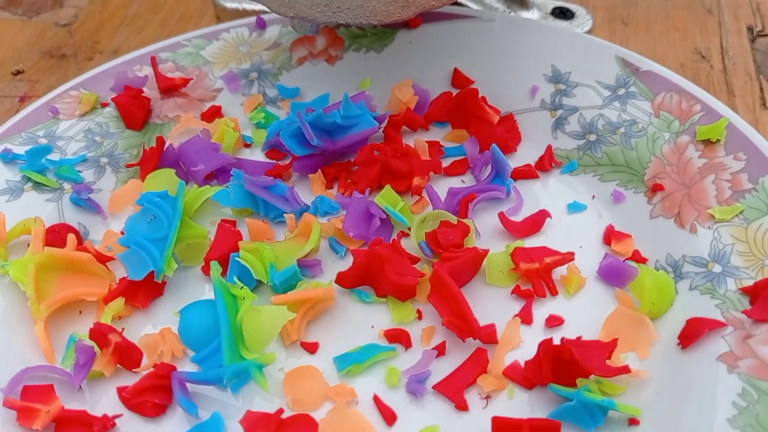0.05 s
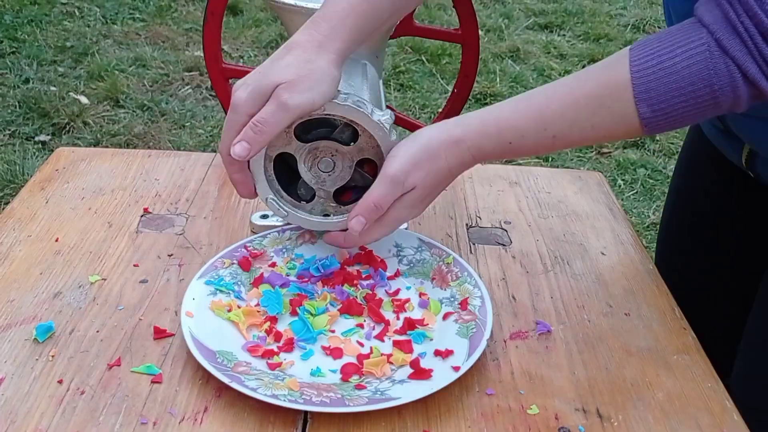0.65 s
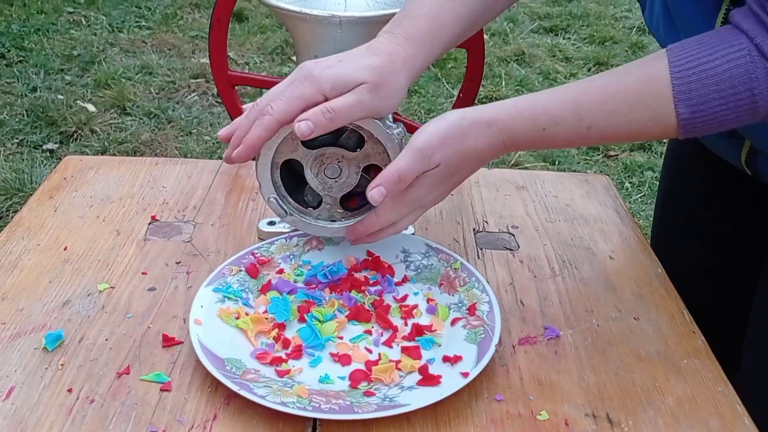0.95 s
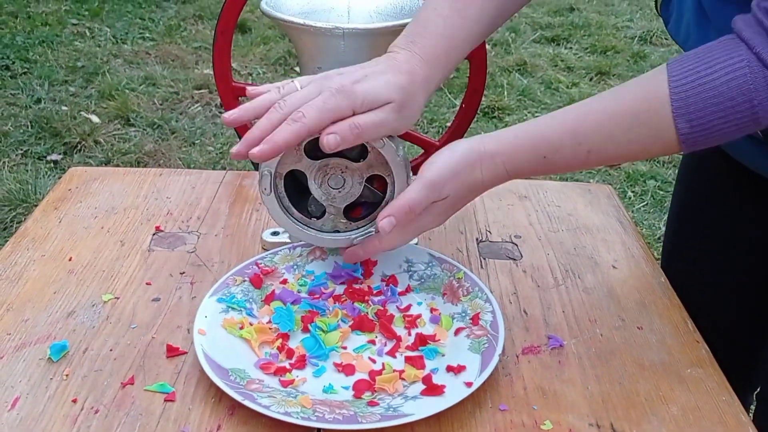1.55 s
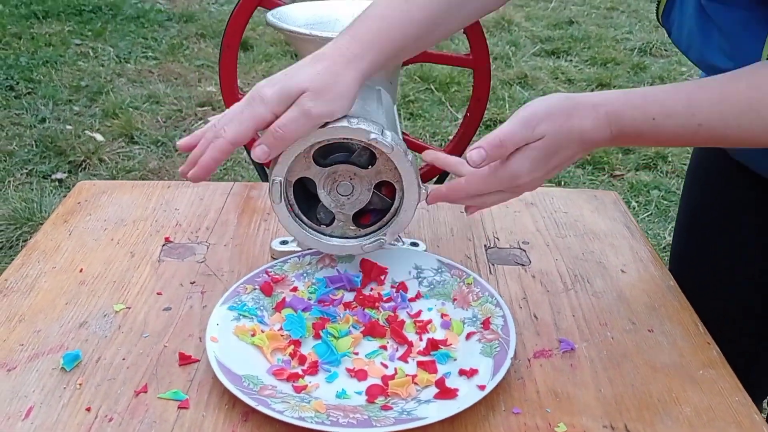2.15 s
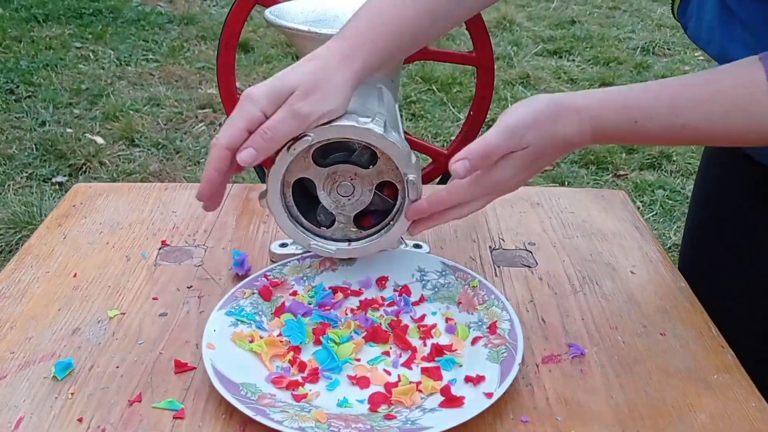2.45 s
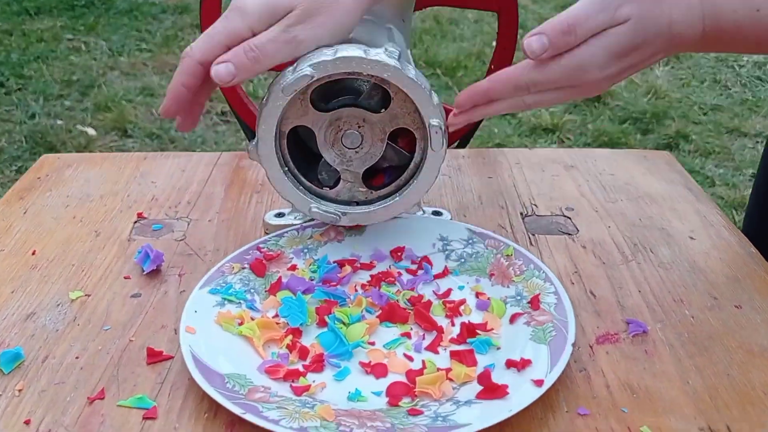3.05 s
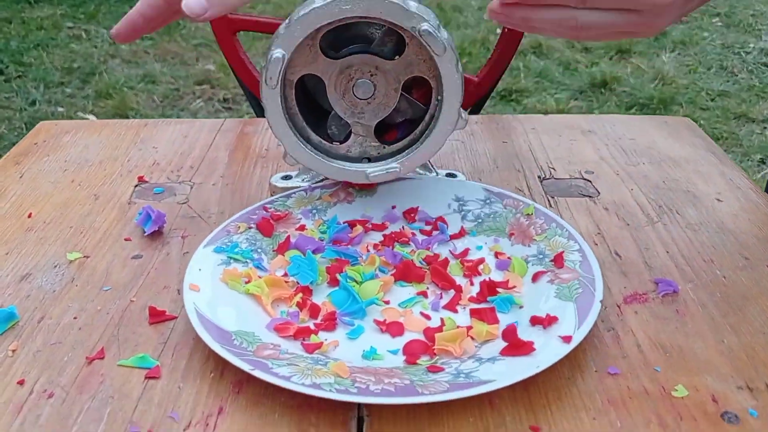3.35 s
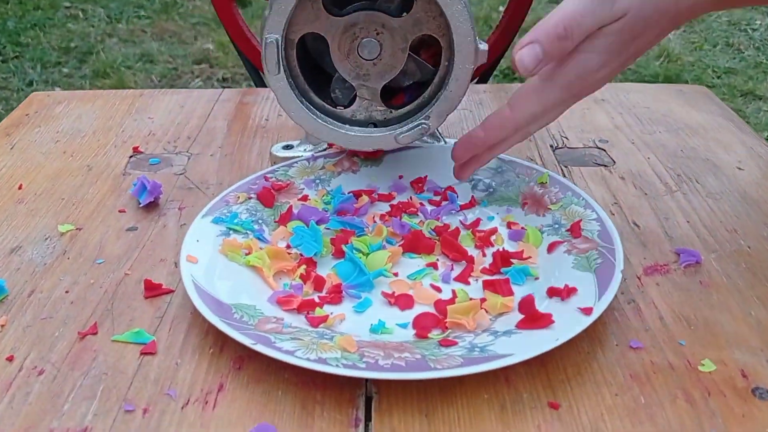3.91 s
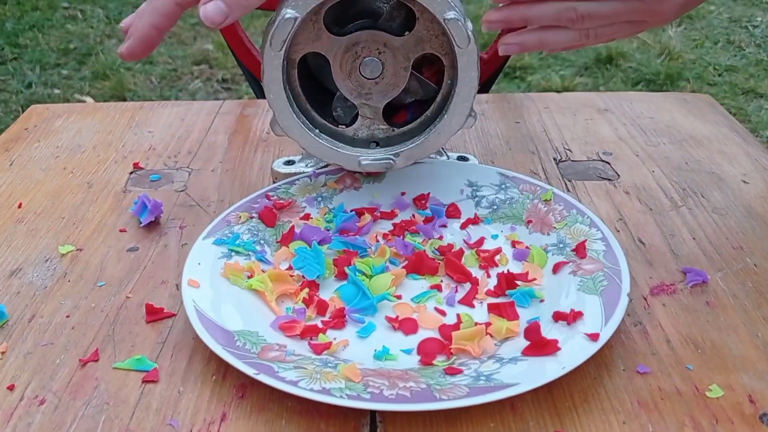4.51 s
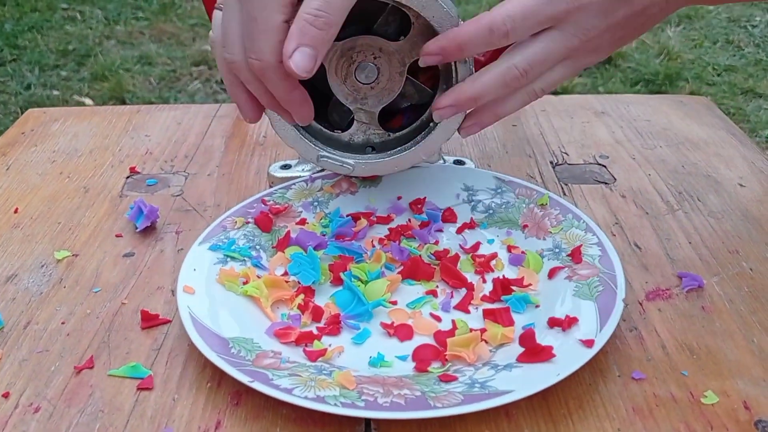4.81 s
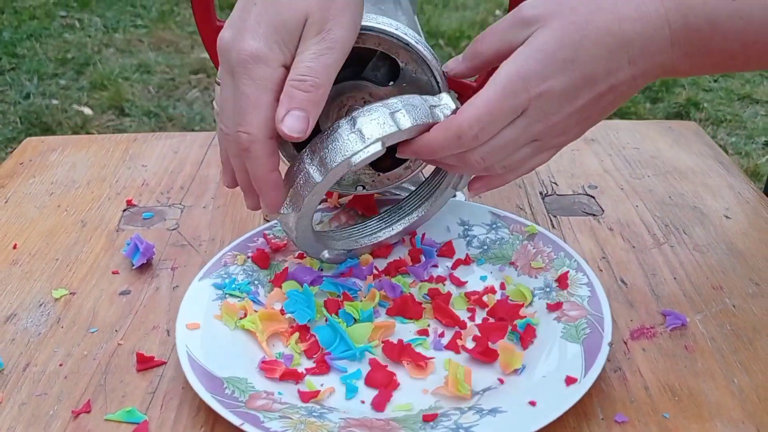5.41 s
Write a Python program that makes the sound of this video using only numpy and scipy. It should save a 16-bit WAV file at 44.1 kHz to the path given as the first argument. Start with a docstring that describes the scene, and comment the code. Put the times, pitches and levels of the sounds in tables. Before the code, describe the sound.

Close up at a wooden table in a quiet garden, a metal grinder rumbles and shears plastic for a moment and stops abruptly. Hands then unscrew its metal ring: gritty scraping twists, three or four a second, mixed with light ticks and rattling knocks. The rasp deepens as the ring loosens, with a low thrum from the table. A last, louder twist ends in a tiny squeal and a sharp, quickly muted clink.

```python
"""Outdoors at a wooden table, close up: a hand-cranked meat grinder crunches a plastic toy and stops dead.
Its retaining ring is then unscrewed in short twists: the thread rasps, the loose ring ticks and knocks,
the table booms. At last the ring sings on the end of the thread, slips off and clinks against the
housing, damped by the hands that hold it. Quiet garden air lies underneath."""
import sys
import numpy as np
from scipy import signal
from scipy.fft import rfft, irfft, next_fast_len
from scipy.io import wavfile
from scipy.ndimage import uniform_filter1d, map_coordinates

SR = 44100
rng = np.random.default_rng(int(sys.argv[2]) if len(sys.argv) > 2 else 0)


def output_pcm(signal):
    """Save a mono or channel-first signal as 16-bit PCM at the path in sys.argv[1].

    Samples are clipped to [-1, 1] before scaling.
    """
    pcm = np.clip(np.atleast_2d(signal).T, -1, 1) * 32767
    wavfile.write(sys.argv[1], SR, np.round(pcm).astype(np.int16))


N = 245637
TIME = np.arange(N) / SR

# The auger jolts the table alike in every turn. Each row: seconds into the turn, peak in dB.
AUGER_JOLTS = [(.06, -19.5), (.134, -14.5), (.15, -16), (0.175, -16), (0.196, -17)]
# The loaded grinder's resonances on its table. Each row: pitch in Hz, width in Hz, gain in dB.
GRINDER_MODES = [(183, 173, 4), (564, 52, 0.5), (880, 220, -9)]
# The broad rumble under them. Each row: frequency in Hz, gain in dB.
GRINDER_EQ = [(24, -56), (40, -26), (163, 9), (516, -8), (615, 5.5), (751, -17), (873, -6), (1340, -15),
              (5870, -34.5), (7360, -41.5), (9940, -44.5), (13100, -51), (16000, -39)]
# The crackle of shearing plastic. Each row: frequency in Hz, gain in dB.
SHEAR_EQ = [(300, -20.5), (1000, -6), (4500, 2), (6800, -3), (7800, -7.5), (9500, -7.5), (12000, -26),
            (14000, -30.5), (15600, -8)]
# The knife's four evenly spaced blades. Each entry: strength of the bite in dB.
BLADE_BITES = [-39, -27, -33, -30.5]
# Twists of the ring. Each row: start in seconds, length in seconds, level in dB.
TWISTS = [(0.586, 0.32, -37), (0.967, 0.2, -32), (1.262, 0.21, -34), (1.563, 0.26, -31),
          (1.857, .18, -33.5), (2.137, 0.11, -36), (2.393, .31, -33), (2.703, 0.21, -33),
          (2.993, 0.2, -31.5), (3.275, 0.23, -30.5), (3.514, 0.24, -31.5), (3.769, 0.17, -31.5),
          (3.994, 0.25, -30), (4.255, 0.19, -30), (4.496, 0.24, -25), (4.743, .21, -36), (5.084, 0.21, -20)]
# How loosely the ring hangs. Each row: time in seconds, looseness from 0 to 1.
RING_LOOSENESS = [(1.0, 0), (2.5, 0.33), (4.3, .3), (4.6, 0.74), (4.85, 0.97)]
# The housing's resonances with the ring on. Each row: pitch in Hz, width in Hz, gain in dB.
HOUSING_RESONANCES = [(554.7, 51, 5), (873, 74, 0), (1099.5, 25.4, -2), (1818, 57, -7), (2065, 73, -4),
                      (2381, 153, -9.5), (3390, 74, -13), (3777, 480, -15), (4950, 34, -23.5),
                      (6390, 436, -14), (9630, 240, -30.5)]
# The broad rasp between them. Each row: frequency in Hz, gain in dB.
HOUSING_EQ = [(50, -43.5), (130, -9.5), (340, -14), (470, -0.5), (760, -5.5), (1300, -11), (1600, -12),
              (2300, -13), (2900, -21), (4300, -19), (6800, -35), (7900, -32), (10000, -33.5), (13000, -50),
              (15000, -44.5)]
# The ring rocks in its thread. Each row: start in seconds, peak in dB, tilt in dB per octave.
RING_KNOCKS = [(0.776, -15.5, 0), (.79, -8, 1), (.809, -9.5, 0), (1.014, -23.5, -1), (1.339, -24, -0.5),
               (1.657, -21.5, -0.5), (2.122, -35, -3.5), (2.242, -24, -4.5), (2.822, -21.5, -3.5),
               (3.011, -33.5, -3), (3.127, -22.5, -2), (3.292, -23.5, -3), (3.646, -17.5, -3),
               (3.798, -25, -5.5), (4.082, -20, 1), (4.28, -23, .5), (4.361, -17, -2.5), (4.537, -17, -1.5),
               (4.575, -15, 0), (5.104, -10, -2), (5.236, -14.5, 3.5), (5.242, -8, -7.5), (5.307, -16, 0.5),
               (5.358, -20, -9), (5.424, -30.5, -14)]
# Light metal ticks as the grip changes. Each row: start in seconds, level in dB.
GRIP_TICKS = [(1.5062, -28), (1.8139, -30), (2.122, -43.5), (2.358, -28.5), (2.655, -42), (3.5003, -26),
              (3.7465, -24.5), (4.0023, -23.5), (4.2475, -27), (4.48, -34.5), (4.7187, -32),
              (5.0812, -26.5)]
# The ticks' bright resonances. Each row: pitch in Hz, width in Hz, gain in dB.
TICK_RESONANCES = [(4670, 580, -6.5), (6090, 74, -2.5), (6540, 270, 7), (7200, 64, -18.5), (7200, 310, -18),
                   (12080, 1200, -11.5), (14100, 500, -13.5)]
# The broad chatter under them. Each row: frequency in Hz, gain in dB.
TICK_EQ = [(100, -34), (1000, -12.5), (2200, -6), (3000, -55), (5000, -8.5), (7000, -4), (8200, -20.5),
           (9700, -12.5), (13500, -35), (16000, -30)]
# The ring strikes the housing. Each row: start in seconds, level in dB, attack in seconds,
# tilt in dB per octave, relative level of the lingering ring in dB.
RING_CLINKS = [(5.301, 2, 0.014, 5.5, -53), (5.3906, -19.5, 0.00095, -0.5, -28.5)]
# The freed ring's partials. Each row: pitch in Hz, gain in dB, hand-damped t60 in seconds.
RING_PARTIALS = [(1681, -20.5, 0.33), (2047, 7, 0.043), (2609, -2.5, 0.13), (3614, 4.5, 0.042),
                 (4760, -10.5, 0.055), (4710, -10, 0.048), (5200, -22.5, .08), (6080, -26.5, 0.14),
                 (6350, -12.5, 0.03), (7410, -31, 0.1), (8300, -26, 0.052), (8980, -36, 0.071)]
# The rubbed ring's squeal. Each row: pitch in Hz, level in dB.
SING_PARTIALS = [(3632, -27.5), (6200, -35.5), (6420, -40), (9000, -44)]
# The table top's boom. Each row: pitch in Hz, width in Hz, gain in dB.
WOOD_MODES = [(142, 33, -10.5), (199.3, 18.5, 4), (294, 110, -10)]
# The ring-out of iron frame and table. Each row: frequency in Hz, t60 in seconds.
TAIL_DECAYS = [(180, 0.53), (600, 0.093), (1800, 0.25), (4000, 0.21), (9000, 0.16), (15000, 0.17)]
# The outdoor bed. Each row: frequency in Hz, gain in dB.
AIR_EQ = [(30, -20.5), (190, -2.5), (400, -27.5), (1200, -21), (2400, -19.5), (3000, -15), (4600, -20),
          (6500, -28), (8500, -41)]
# Faint narrow bands of hiss in the background. Each row: centre in Hz, width in Hz, gain in dB.
HISS_BANDS = [(1540, 68, -8.5), (1770, 110, -6), (3614, 77, -5), (4125, 120, -4)]

CRANK_END_S, TURN_S, FIRST_CUT_S = .489, .226, .023
TURN_STARTS_S = np.arange(0, CRANK_END_S, TURN_S)
# Each pair: the setting on a tight thread, and what full looseness adds.
GRIT_DB, LOOSE_GRIT_DB = -6.5, -10
PUSH_DB, LOOSE_PUSH_DB = -22, 13
RASP_HZ, LOOSE_RASP_OCTAVES = 995, -1.27
KNOCK_T60_S, LOOSE_T60_S = 0.067, 0.052


def cranking():
    """The auger rumbles and jolts while the blades shear off bits of plastic, alike in every turn."""
    loaded = body(GRINDER_EQ, GRINDER_MODES, eq_db=3.5)
    frame = lambda hz: loaded(hz) * below(75, hz, order=1)
    dull_frame = lambda hz: frame(hz) * below(hz, 1800, order=2)
    churn = filtered(asperities(per_s=2700, spread_db=2.5), frame)
    rumble = amp(-31 + 3.4 * wobble(40)) * shifting(churn, patchy_db=3.5)
    pressure = np.full(N, amp(-55))
    for turn in TURN_STARTS_S:
        for s, db in AUGER_JOLTS:
            add(rumble, turn + s, hit(rattle(t60=0.082, rise=0.0038), dull_frame, db))
        for blade, db in enumerate(BLADE_BITES):
            cut_s = turn + FIRST_CUT_S + TURN_S * blade / len(BLADE_BITES)
            pressure += amp(db) * swell(cut_s, half_s=0.012)
    crackle = filtered(asperities(per_s=1500, spread_db=3), body(SHEAR_EQ, [(6454, 110.5, 10)]))
    return rumble + pressure * shifting(crackle, patchy_db=5)


def blade_squeals(hz=6655, db=-16):
    """The tightest blade scrapes the cutting plate and sings once a turn."""
    contact = sum(swell(turn + 0.0862, half_s=0.0042) for turn in TURN_STARTS_S)
    return squeal(contact, [(hz, db)])


def twist_envelopes():
    """Each twist speeds up, then stops; a looser ring is deeper, less gritty and shakes the table more."""
    rub, grit, push = np.zeros((3, N))
    centre_hz = np.full(N, float(RASP_HZ))
    for start, length, db in TWISTS:
        span = slice(round(start * SR), round((start + length) * SR))
        phase = np.interp((TIME[span] - start) / length, [0, .43, 1], [0, .5, 1])  # fastest 43% in
        speed = np.abs(np.sin(np.pi * phase))
        late_swell = np.abs(np.sin(np.pi * phase ** 1.52)) ** 0.5  # the push reaches the table late
        loose = looseness(start + length / 2)
        rub[span] += amp(db) * speed ** 1.64
        grit[span] += amp(db + GRIT_DB + LOOSE_GRIT_DB * loose) * speed ** 2.27
        push[span] += amp(db + PUSH_DB + LOOSE_PUSH_DB * loose) * late_swell
        centre_hz[span] = RASP_HZ * 2 ** (LOOSE_RASP_OCTAVES * loose - 0.84 * phase ** 2.1)
    return rub, grit, push, centre_hz


def looseness(s):
    """How loosely the ring hangs at time s, from 0 to 1."""
    return np.clip(np.interp(s, *np.transpose(RING_LOOSENESS)), 0, 1)


def thread_rasp(housing, rub, grit, centre_hz):
    """Coarse bumps shake the housing's low modes, fine grit the high ones; both catch and slip."""
    lows = lambda hz: housing(hz) * below(hz, 1300) * below(380, hz, order=2)
    highs = lambda hz: housing(hz) * below(1450, hz)
    sinking = lambda hz, s: 6 * np.exp(-(np.log2(hz / np.interp(s, TIME, centre_hz)) / 1.06) ** 2)
    catch, snag = wobble(55), snags()
    bumps = filtered(snag * asperities(per_s=1400, spread_db=1.5), lows)
    grains = filtered(snag ** 0.32 * asperities(per_s=2200, spread_db=2), highs)
    coarse = rub * amp(-3.5 + 1.16 * catch) * shifting(bumps, patchy_db=5.5, emphasis=sinking)
    fine = grit * amp(0.17 + 1.3 * catch) * shifting(grains, patchy_db=3.5)
    return coarse + fine


def snags(per_s=42, decay_s=0.0091):
    """Burrs catch the thread at random: each gives the rasp a sudden lift that dies away."""
    burrs = (rng.random(N) < per_s / SR) * amp(-6)
    return unit(1 + signal.lfilter([1], [1, -np.exp(-1 / (decay_s * SR))], burrs))


def knocks(housing):
    """The ring drops across the play of its thread: a blow, and a rattle that lengthens as it loosens."""
    out = np.zeros(N)
    contact = lambda hz: housing(hz) * below(125, hz, order=3) * below(hz, 9500, order=2)
    for s, db, tilt_db in RING_KNOCKS:
        tilted = lambda hz: contact(hz) * amp(tilt_db * np.log2(np.clip(hz, 200, 6000) / 1000))
        force = rattle(KNOCK_T60_S + LOOSE_T60_S * looseness(s), rise=0.0013)
        add(force, .0015, 0.57 * np.hanning(26))  # the blow
        add(out, s, hit(force, tilted, db))
    return out


def clinks():
    """The freed ring cracks against the housing; the hands choke it, leaving a faint, beating shimmer."""
    out, t = np.zeros(N), np.arange(SR // 3) / SR
    contact = body([(60, -47), (800, 8), (2100, 10), (4000, 4), (7000, -8), (11000, -13), (15000, -21.5)])
    for s, db, rise, tilt_db, free_db in RING_CLINKS:
        ring = np.zeros(len(t))
        for hz, mode_db, t60 in RING_PARTIALS:
            jitter = .3 * wobble(130, size=len(t))  # the sliding contact disturbs the phase
            tone = np.sin(2 * np.pi * (hz * t + rng.random()) + jitter)
            beat = np.cos(2 * np.pi * rng.uniform(4, 14) * t)  # the lugs split each mode into a pair
            free_t60 = .34 * (2600 / hz) ** .5
            decay = amp(-60 * t / t60) + beat * amp(free_db - 60 * t / free_t60)
            ring += amp(mode_db + tilt_db * np.log2(hz / 2600) + rng.normal(0, 1)) * decay * tone
        attack = 1 - np.exp(-(t / rise) ** 2)
        add(out, s, amp(db) * ring * attack)
        crack = lambda hz: contact(hz) * amp(1.6 * tilt_db * np.log2(np.maximum(hz, 2600) / 2600))
        add(out, s, hit(rattle(t60=0.046, rise=rise), crack, peak_db=-17))
    return out


def ring_squeal(start_s=5.236, length_s=0.066):
    """The ring sings as it rubs over the last turn of the thread."""
    phase = np.clip((TIME - start_s) / length_s, 0, 1)
    return squeal(np.sqrt(4 * phase * (1 - phase)), SING_PARTIALS)


def ticks(housing):
    """Bright metal chatter, coloured anew at each contact point, with a small housing knock behind it."""
    out = np.zeros(N)
    thin_housing = lambda hz: housing(hz) * below(740, hz, order=1)
    for s, db in GRIP_TICKS:
        modes = [(hz * rng.normal(1, .02), width, gain + rng.normal(0, 3))
                 for hz, width, gain in TICK_RESONANCES]
        add(out, s, hit(rattle(t60=0.03, rise=0.0047), body(TICK_EQ, modes), db - 1))
        add(out, s + 0.003, hit(rattle(t60=0.058, rise=0.0012), thin_housing, db - 9.5))
    return out


def slides(lag_s=0.052):
    """After each tick the ring slides lightly into place: a thin scrape on the same high modes."""
    scrape = filtered(asperities(per_s=4200, spread_db=2), body(TICK_EQ, TICK_RESONANCES, eq_db=11))
    contact = sum(swell(s + lag_s, half_s=0.011) for s, _ in GRIP_TICKS)
    return amp(-53.5) * contact * unit(scrape)


def table_boom(push):
    """The table top booms at its low modes as the grinder is pushed about."""
    wood = body([(30, -55), (90, -23.5), (200, -27.5), (400, -42.5), (1000, -100.5)], WOOD_MODES)
    force = rng.standard_normal(N)
    return amp(3) * filtered(push * force, wood) / filtered(force, wood).std()


def ring_out(x):
    """The many weak modes of frame and table leave a tail, each band fading at its own speed."""
    hz, t, noise = signal.stft(rng.standard_normal(SR // 2), SR, nperseg=256)
    band_hz, band_t60 = np.transpose(TAIL_DECAYS)
    t60 = np.interp(np.log(hz + 1), np.log(band_hz), band_t60)
    tail = signal.istft(noise * amp(-60 * t / t60[:, None]), SR, nperseg=256)[1]
    return signal.fftconvolve(x, tail / np.linalg.norm(tail))[:N]


def garden_air():
    """A quiet, gently wavering outdoor bed with faint narrow bands of hiss."""
    bed = filtered(rng.standard_normal(N), body(AIR_EQ, HISS_BANDS, eq_db=-1.5))
    return amp(-67.5 + 0.94 * wobble(6)) * unit(bed)


def asperities(per_s, spread_db):
    """Tiny random collisions of two rough surfaces, unequal in size."""
    collisions = rng.random(N) < per_s / SR
    return collisions * rng.choice([-1, 1], N) * amp(spread_db * rng.standard_normal(N))


def rattle(t60, rise):
    """The force of one loose contact: a burst of collisions that dies away (times in seconds)."""
    t = np.arange(SR // 6) / SR
    return rng.standard_normal(len(t)) * amp(-60 * t / t60) * (1 - np.exp(-t / rise))


def hit(force, gain, peak_db):
    """A force sounds through a body's gain curve, scaled to a set peak."""
    sound = filtered(force, gain)
    return amp(peak_db) * sound / np.abs(sound).max()


def squeal(envelope, partials):
    """Rubbed metal sings briefly on its modes, with an unsteady level and phase."""
    flutter, drift = amp(1.3 * wobble(150)), .45 * wobble(170)
    return envelope * flutter * sum(amp(db) * np.sin(2 * np.pi * hz * TIME + drift) for hz, db in partials)


def shifting(x, patchy_db, emphasis=lambda hz, s: 0):
    """The contact keeps moving, so narrow resonances come and go; emphasis is a moving EQ in dB."""
    hz, s, spectra = signal.stft(x, SR, nperseg=1024)
    patches = uniform_filter1d(rng.standard_normal(spectra.shape), size=3, axis=0)
    patches = unit(uniform_filter1d(patches, size=7, axis=1))
    depth_db = patchy_db * np.clip(hz / 1200, 0, 1)[:, None]
    gain = amp(depth_db * patches + emphasis(hz[:, None] + 1, s))
    return unit(signal.istft(spectra * gain, SR, nperseg=1024)[1][:N])


def body(eq, modes=(), eq_db=0):
    """A gain curve: resonances (Hz, width in Hz, dB) standing on a broad EQ (Hz, dB)."""
    eq_hz, db = np.transpose(eq)
    broad = lambda hz: amp(np.interp(np.log(hz), np.log(eq_hz), db) + eq_db)
    peaks = lambda hz: sum(amp(gain) ** 2 / (1 + ((hz ** 2 - pitch ** 2) / (hz * width)) ** 2) ** 1.5
                           for pitch, width, gain in modes)
    return lambda hz: np.sqrt(broad(hz) ** 2 + peaks(hz))


def filtered(x, gain):
    """Causal (minimum-phase) filter with the given gain curve."""
    size = 2 * next_fast_len(len(x) // 2 + 4096)
    hz = np.fft.rfftfreq(size, 1 / SR) + 1
    cepstrum = irfft(np.log(np.maximum(gain(hz), 1e-6)), size)
    cepstrum[1:size // 2] *= 2
    cepstrum[size // 2 + 1:] = 0
    return irfft(rfft(x, size) * np.exp(rfft(cepstrum)), size)[:len(x)]


def below(hz, edge_hz, order=4):
    """Low-pass gain; swap the arguments for a high-pass."""
    return 1 / np.sqrt(1 + (hz / edge_hz) ** (2 * order))


def swell(middle_s, half_s):
    """A bell-shaped envelope."""
    distance = (TIME - middle_s) / half_s
    return np.exp(-.5 * distance ** 2) * (np.abs(distance) < 5)


def wobble(rate, size=N):
    """A smooth random curve, rate knots a second."""
    return map_coordinates(rng.standard_normal(int(size * rate / SR) + 4), [TIME[:size] * rate / SR])


def add(track, s, sound):
    """Mix a sound into the track at time s."""
    part = track[round(s * SR):][:len(sound)]
    part += sound[:len(part)]


def amp(db):
    """Decibels to gain."""
    return 10 ** (np.asarray(db) / 20)


def unit(x):
    """Scale to an RMS of one."""
    return x / np.sqrt(np.mean(x ** 2) + 1e-20)


def scene():
    """Grinding, then unscrewing, over the garden bed; all centred, with a little width in the treble."""
    turning = np.clip((CRANK_END_S - TIME) / 0.0064, 0, 1)
    grinding = turning * (cranking() + blade_squeals())
    housing = body(HOUSING_EQ, HOUSING_RESONANCES)
    rub, grit, push, centre_hz = twist_envelopes()
    twisting = thread_rasp(housing, rub, grit, centre_hz) + table_boom(push)
    unscrewing = twisting + knocks(housing) + ticks(housing) + slides() + clinks()
    mid = grinding + unscrewing + ring_squeal() + amp(-16.5) * ring_out(unscrewing) + garden_air()
    treble = filtered(mid, lambda hz: below(4700, hz, order=14) * (hz / 9000) ** .7)
    side = amp(-31.5) * np.tanh(wobble(1200)) * treble
    return np.array([mid + side, mid - side])


def record(dry):
    """A steep high cut at 16 kHz."""
    size = next_fast_len(N + SR // 4)
    high_cut = below(np.fft.rfftfreq(size, 1 / SR), 16000, order=130)
    return irfft(rfft(dry, size) * high_cut, size)[:, :N]


dry = scene()
out = record(dry)
output_pcm(out)
```